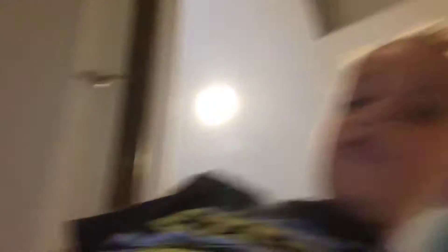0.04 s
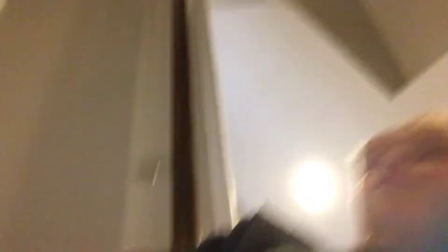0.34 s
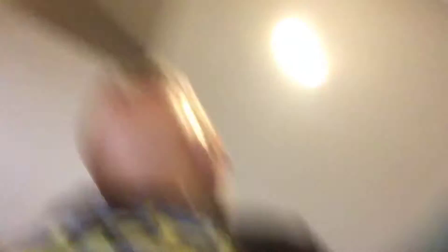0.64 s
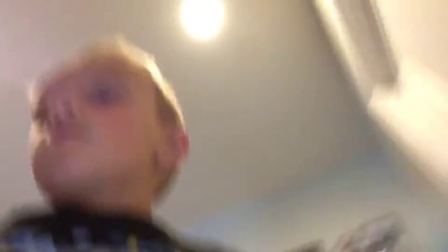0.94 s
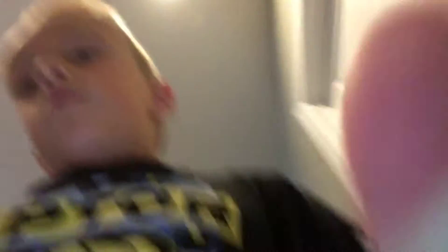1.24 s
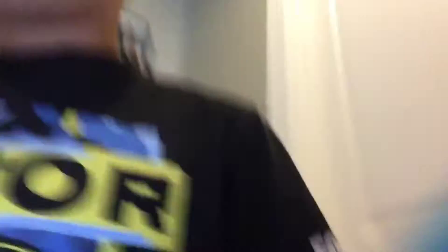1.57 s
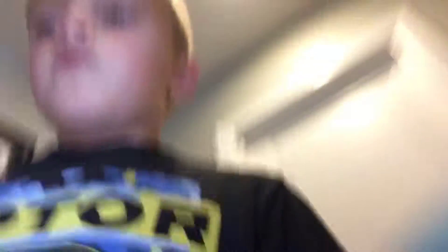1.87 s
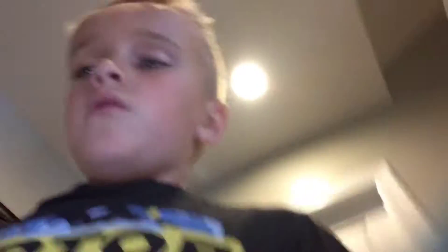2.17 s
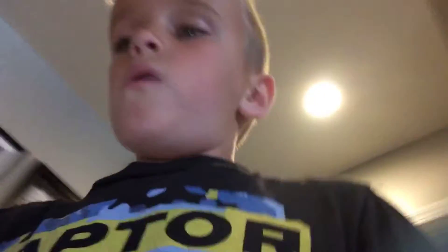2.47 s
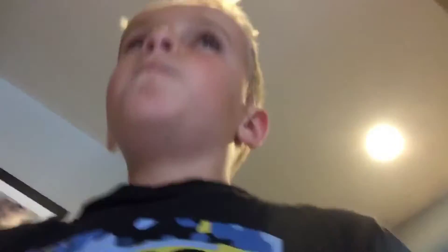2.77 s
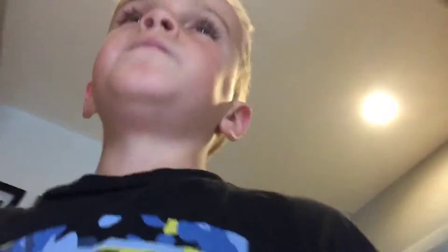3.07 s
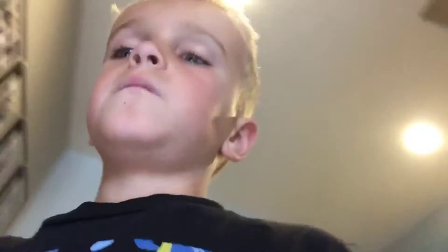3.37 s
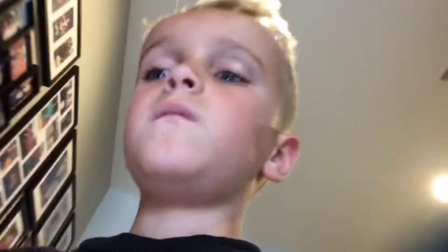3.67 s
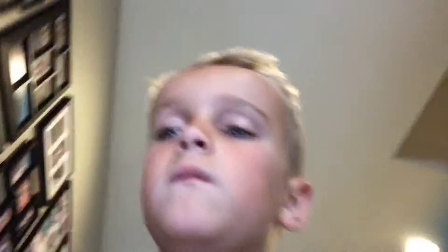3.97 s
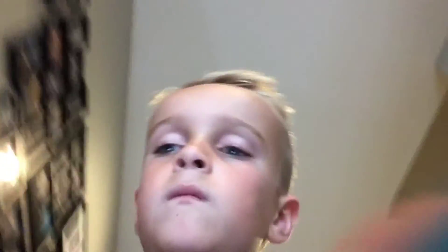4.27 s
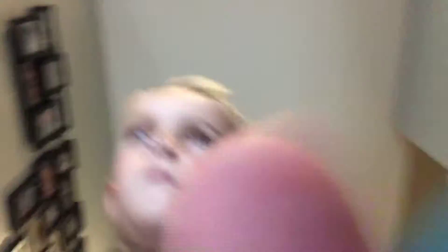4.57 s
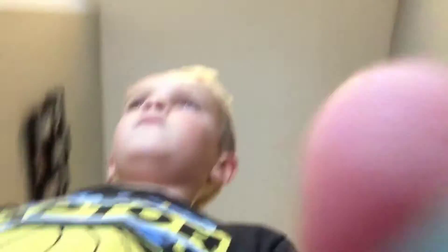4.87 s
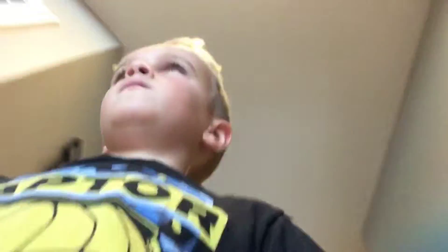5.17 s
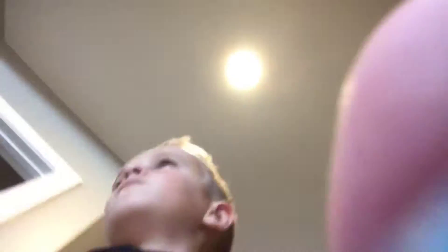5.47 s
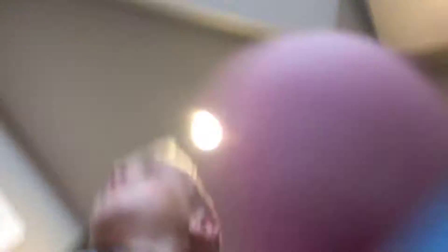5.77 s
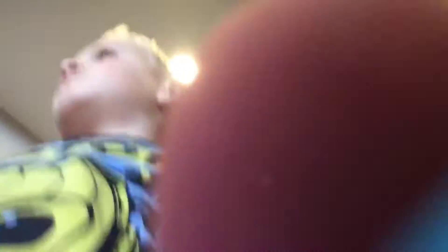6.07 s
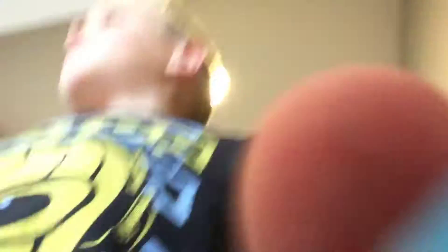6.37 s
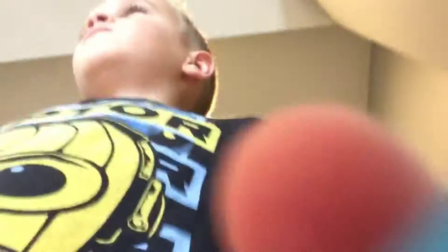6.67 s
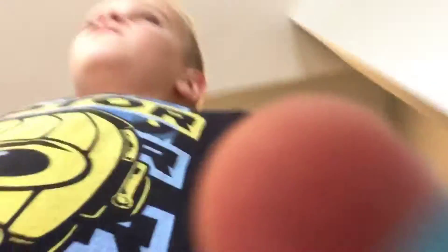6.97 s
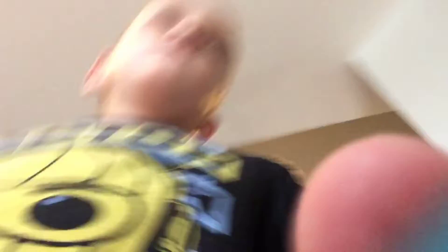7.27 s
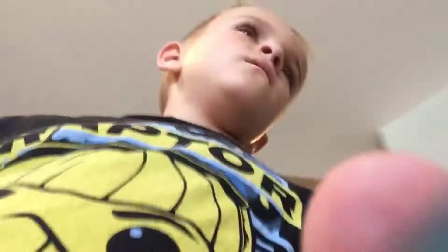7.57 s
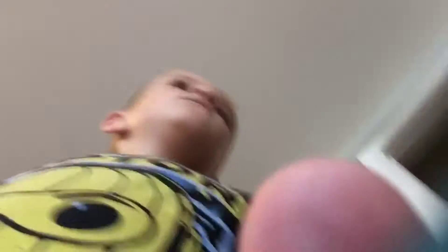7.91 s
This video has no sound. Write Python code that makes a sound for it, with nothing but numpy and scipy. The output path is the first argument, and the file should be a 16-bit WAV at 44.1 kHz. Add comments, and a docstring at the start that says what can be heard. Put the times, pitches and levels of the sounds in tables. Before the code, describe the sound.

Fingers handle a phone right beside its microphone in a quiet room, with faint low room tone and almost no echo. From the start, dull fingertip taps and short grainy rubs follow each other irregularly, with small squeaks and a clack in the first half second. A brief creak comes at 1.5 seconds, then firm knocks and scuffs around 1.8 and a squeaky rub at 2.2. The touches are lighter from about 2.5 to 3.5 seconds, before a cluster of thuds and clacks between 3.7 and 4.3. Around 5.2 seconds a fingertip rubs and squeaks with a wavering pitch, followed by pressed creaks near 5.7 and 6.1. Strong, low thuds land at about 6.6, 7.1 and 7.8 seconds among softer scuffs. A finger sometimes covers the microphone, making the touches duller and hollow, around 2 seconds and repeatedly after 5.

```python
"""Fingers shift their grip on a phone, right beside its microphone, as it is carried through a quiet room.
Skin taps the case, rubs over it in short grainy strokes, squeaks and creaks; some taps ring with a clack.
Each contact reaches the microphone treble first and bass last, so a tap falls in pitch to a thud.
Now and then a finger covers the port and dulls the top. At this distance the walls add almost nothing."""
import sys
import numpy as np
from scipy import signal
from scipy.fft import irfft
from scipy.io import wavfile
from scipy.ndimage import uniform_filter1d, minimum_filter1d

SR = 44100
rng = np.random.default_rng(int(sys.argv[2]) if len(sys.argv) > 2 else 0)


def store_wav(level_fs):
    """Save 16-bit WAV to argv[1]."""
    pcm = np.round(np.clip(np.atleast_2d(level_fs), -1, 1) * 32767)
    wavfile.write(sys.argv[1], SR, pcm.T.astype(np.int16))


N = 354692
FFT_SIZE = 8192
HZ = np.fft.rfftfreq(FFT_SIZE, 1 / SR)

# Levels are relative within each table.
# steady noise of room and microphone: frequency_hz, level_db
ROOM_TONE = [(15, -38), (25, -1), (87, -0.5), (309, -10.5), (427, -17.5), (677, -14.5), (1160, -42),
             (1740, -21.5), (2840, -35), (5570, -37), (10100, -47), (14000, -62), (16000, -80)]
# a faint hollow ring across the room: time_s, level_db
DISTANT_RING = [(2.38, -63), (2.45, -58), (2.505, -43.5), (2.55, -53), (2.6, -51), (2.66, -79)]
# the resting hand creeping on the case: time_s, level_db
GRIP_LEVEL = [(0.0, -40), (0.18, -26.5), (0.4, -39.5), (0.9, -35.5), (1.15, -47), (1.4, -38), (1.9, -39),
              (2.45, -33.5), (3.1, -49), (3.78, -36), (3.98, -46), (5.3, -41.5), (5.5, -43.5),
              (5.82, -32.5), (6.0, -42.5), (6.9, -44.5), (7.3, -39.5), (8.04, -49)]
# a finger lies over the microphone port: start_s, end_s, cover_db
PORT_COVERED = [(1.5, 1.56, 8), (1.72, 2.3, 6), (5.26, 5.86, 13.5), (6.02, 6.3, 17), (6.45, 6.61, 13),
                (7.0, 7.26, 25), (7.7, 8.04, 17)]
# the hollow tone that this gives a touch: frequency_hz, gain_db_per_cover_db
PORT_HOLLOW = [(110, 0), (290, -0.07), (450, -0.25), (580, 0), (800, 0.23), (1400, -0.33), (2300, 0),
               (3300, 0), (4800, 0.35), (6200, 0.2), (7500, 0)]
# creaks of a hard-pressed finger: start_s, length_s, first_wait_s, level_db, hardness_db
CREAKS = [(1.5153, .03, .0115, -9.5, -12), (5.6846, .069, .0033, -6, -14), (6.04, .048, .0135, -23, -12),
          (6.0946, .102, 0.014, -4.5, -14.5)]
# the case tightened by that finger: frequency_hz, gain_db
PRESSED_RESPONSE = [(60, -4.5), (110, 3), (290, 0.5), (440, -12), (600, -1), (820, 2), (1700, -1.5),
                    (5500, -4)]
# fingertip squeaks, one list of points each: time_s, pitch_hz, level_db
SQUEAKS = [
    [(.197, 250, -22), (.215, 296, -19), (.23, 318, -25), (.24, 337, -14.5), (.25, 318, -42)],
    [(.29, 250, -23), (.31, 221.4, -28), (.328, 175, -31)],
    [(.4, 429, -38), (.418, 464, -22), (.432, 467, -38)],
    [(2.2, 261.6, -23), (2.215, 300, -26.5), (2.24, 373, -23), (2.262, 300, -40)],
    [(5.19, 339, -21), (5.215, 387, -22.5), (5.228, 226.3, -14), (5.25, 211.6, -22.5), (5.271, 418, -16.5),
     (5.295, 378.7, -17.5), (5.316, 297, -17), (5.324, 240, -23)],
    [(5.39, 324.3, -42), (5.41, 353.6, -32.5), (5.432, 256, -37.5)],
    [(5.66, 360, -50), (5.675, 348, -29), (5.685, 334, -20)],
    [(7.022, 85.3, -40), (7.06, 78.5, -63), (7.085, 130.4, -23)],
    [(7.73, 116.5, -42.5), (7.76, 139.4, -51.5), (7.8, 197, -32.5)],
]
# how the case answers a squeak: frequency_hz, gain_db
SQUEAK_RESPONSE = [(40, -29), (120, 9.5), (230, 14), (410, -6.5), (620, 5.5), (820, 0.5), (1150, -8),
                   (1650, -20.5), (2300, -19), (3000, -38.5), (5700, -33.5), (7500, -59), (16000, -75.5)]
# strokes of skin over the case: start_s, end_s, level_db, swell_db, brightness_db
RUBS = [(0.087, 0.2, -36.5, -2, -9.5), (0.192, 0.247, -18.5, 2.5, -25), (0.274, 0.34, -20, -9, -39),
        (0.359, 0.436, -24.5, -9.5, -17), (0.43, 0.66, -39, -8, -17.5), (0.639, 0.688, -24, -6.5, -10.5),
        (0.762, 0.816, -24, -4.5, -11), (0.816, 0.914, -25.5, 1, -8.5), (0.896, 0.942, -38.5, -1, 3),
        (0.955, 1.025, -35, 11, 0.5), (1.087, 1.15, -37, -9, -4.5), (1.19, 1.217, -35.5, -8, -7),
        (1.235, 1.324, -32, 2, 1.5), (1.309, 1.377, -27, -6, 2), (1.369, 1.446, -39, -10, -7.5),
        (1.445, 1.463, -29, -6, -0.5), (1.514, 1.55, -25, 7, -21), (1.645, 1.693, -29.5, -20, -1.5),
        (1.711, 1.755, -25.5, 13, -22), (1.791, 1.81, -33, -3, -9.5), (1.812, 1.832, -12, -2, -15),
        (1.867, 1.889, -41, 3, -6), (1.975, 2.081, -26.5, -12.5, -24), (2.195, 2.268, -17, -1, -17.5),
        (2.31, 2.363, -31, -8, -16), (2.378, 2.497, -33, -2, -36), (2.655, 2.679, -28, 3, -29),
        (2.712, 2.76, -37, 16, -9), (2.752, 2.82, -35.5, -9, -27), (3.158, 3.394, -49.5, 9, -3),
        (3.531, 3.656, -44, -22, -5), (3.68, 3.768, -36, 4, -14), (3.858, 3.905, -30, 10, -9.5),
        (3.904, 3.97, -21, -17, -8.5), (4.084, 4.206, -47, -1, -15), (4.198, 4.314, -43, 16, -9),
        (4.392, 4.437, -55.5, -2, 2), (4.553, 4.748, -43.5, 3.5, -10), (4.89, 5.03, -44.5, 18, -5.5),
        (5.109, 5.198, -40, -2, -4.5), (5.183, 5.259, -22, 12, -11), (5.387, 5.44, -32, -5.5, -42),
        (5.641, 5.677, -29.5, 11, -23.5), (5.687, 5.715, -20, -1.5, -17.5), (5.801, 5.871, -29, -6, -25),
        (5.933, 6.007, -34.5, 1, -21), (6.027, 6.1, -29, 23, -27), (6.093, 6.207, -25.5, 4, -40),
        (6.456, 6.563, -40.5, -1, -10), (6.549, 6.6, -28.5, 0, -19), (6.924, 6.981, -53.5, 4, -9),
        (7.024, 7.099, -39.5, 17, -18), (7.173, 7.247, -38.5, -9, -10), (7.388, 7.509, -35, -16, -10.5),
        (7.726, 7.824, -40, 11.5, -7.5), (7.844, 7.948, -40, -11, -11)]
# how the case answers a stroke: frequency_hz, gain_db
RUB_RESPONSE = [(20, -64), (50, 1.5), (78, 3), (300, 5), (480, -2.5), (750, -9), (1200, -13), (1700, -13),
                (2200, -17), (2900, -23), (6000, -29), (7400, -33.5), (9000, -33.5), (11000, -43),
                (16000, -47)]
# the brief pitched clack that rings in some fingertip taps: start_s, level_db, pitch_hz
TAP_RINGS = [(0.2845, -5.5, 2010), (0.339, -17, 2350), (0.846, -6, 1630), (1.747, -6, 1200),
             (1.822, -9, 1880), (3.65, -26, 1500), (3.916, -8, 1700), (4.244, -17, 1300),
             (4.295, -5.5, 1440), (7.1145, -19, 930), (7.147, -19, 1380)]
# the modes of that clack: pitch_ratio, level_db
TAP_RING_MODES = [(.77, -2), (1, 3.5), (1.33, -5.5)]
# fingertip taps: start_s, level_db, weight_db, thud_hz, hardness_db (pad below 0, nail above)
TAPS = [(0.157, -22, 21, 198, -24), (0.248, -22, 18.5, 200, -24), (0.284, -5.5, -2.5, 316, -4),
        (0.34, -6, 19, 250, -22), (0.362, -23.5, 23, 293, -9), (0.371, -25.5, 28, 120, -10),
        (0.389, -28, 31, 129, -30), (0.464, -11.5, 4.2, 240, -22), (0.643, -20.5, 2, 148, -2.5),
        (0.656, -12, 18, 199, -11), (0.663, -12, 21.5, 225, -7.5), (0.674, -14, 10.6, 144, -12),
        (0.83, -29, 10, 180, 11), (0.847, -17.5, 4.3333, 180, -4), (0.866, -13, 5.3, 310, -9),
        (0.903, -15.5, 13, 146, -17), (0.978, -19, 3.7, 130, -18), (0.994, -14.5, 14.7, 78.6, 3),
        (1.024, -23, 21.5, 201, -28), (1.207, -33.5, 35.8, 89, -10), (1.247, -19.5, 20, 204, -6),
        (1.305, -15.5, 25.5, 135, -6), (1.447, -17, 17.2, 105, -8), (1.621, -43, 32, 150, 7),
        (1.653, -12.5, 21, 245, -18), (1.681, -26.5, 25, 80, 6.5), (1.729, -25, 26, 121, -1),
        (1.747, -7, 11.7, 309, -14.5), (1.815, -12.5, 10.7, 308, -12), (1.8214, -2.5, 11, 195, -18),
        (2.012, -6.5, 18, 207, -18), (2.065, -16.5, 15, 113, -16.5), (2.143, -28.5, 13, 190, -5),
        (2.259, -33, 29.5, 129, -16), (2.4, -23.5, 21, 203, -21), (2.529, -25.5, 26.4, 233, -33),
        (2.673, -26.5, 26.6, 144, -27), (2.75, -16.5, 24.8, 187, -3), (2.782, -17, 20.4, 134, -13),
        (2.888, -19, 15.4, 233, -16.5), (2.926, -43.5, 10, 220, 2.5), (3.018, -32.5, 17, 158, -14),
        (3.178, -29.5, 16, 120, -5.5), (3.253, -26.5, 16, 253, -16), (3.292, -24.5, 17, 221, -11.5),
        (3.45, -28.5, 26.5, 149, -45), (3.539, -24, 8.2, 120, -4.5), (3.65, -22, 15.4, 290, -18),
        (3.678, -9, 16.3, 200, -17.5), (3.6841, -3.5, 13.3, 300, -22), (3.712, -15.5, 10, 230, -44),
        (3.734, -18, 11, 80, -9.5), (3.757, -46.5, 15, 110, 37.5), (3.837, -27.5, 19.4, 202, 0),
        (3.862, -32, 36, 201, 23.5), (3.915, -13, 23.5, 70, 8.5), (3.971, -19, 17.5, 143, 2),
        (4.148, -34.5, 7.2, 180, -4), (4.19, -26.5, 12.5, 320, -2.5), (4.218, -22.5, 18.7, 200, -5),
        (4.246, -14, 17.7, 196, -2.5), (4.2933, -13.5, 12.5, 90.5, -5.5), (4.413, -35, 19.7, 120, -4.5),
        (4.671, -17.5, 10.6, 217, -9), (4.709, -22, 22, 147, -3), (4.724, -25, 20, 180, -4),
        (4.934, -33, 11, 300, 1), (4.977, -16, 10, 231, -8), (5.139, -18.5, 13, 120, -7),
        (5.241, -14, 17, 168, -4), (5.326, -11.5, 16.6, 113, -17), (5.88, -28, 24.3, 90, 3),
        (5.965, -24, 19, 170, -7), (6.1378, -10, 7.7, 132, -10.5), (6.325, -18, 16.2, 170, -0.5),
        (6.348, -27.5, 12, 200, -3), (6.508, -27, 24, 190, -10), (6.568, -29, 7.6, 181, -3),
        (6.5882, -2, 15.8, 126, -16.5), (6.622, -27, 18.7, 130, -7), (6.697, -39.5, 20, 220, 5),
        (6.785, -32, 15.4, 200, -6.5), (7.1141, 0.5, 10.4, 117, -13.5), (7.146, -23.5, 21.7, 230, -18),
        (7.316, -15, 16, 120, -7), (7.396, -30, 18, 159, 3.5), (7.437, -18, 7.4, 130, -7),
        (7.482, -21, 6.9, 211, -34), (7.815, -2.5, 12, 104, -8), (7.881, -16, 11, 194, -29)]
# how the case answers a tap: frequency_hz, gain_db
TAP_RESPONSE = [(20, -56), (45, -22), (60, -4.5), (74, 3), (160, -3.5), (420, -3), (620, 3), (760, -5),
                (940, -14), (1250, -10.5), (1700, -16.5), (2200, -15.5), (2900, -30), (3500, -24.5),
                (4600, -28), (6200, -28), (7300, -34.5), (9000, -30.5), (11000, -43.5), (16000, -56)]

# the ranges that a contact can stress
THUD_HZ, BODY_HZ, KNOCK_LOW_HZ, KNOCK_HIGH_HZ = 110, 290, 580, 820
CLICK_HZ, TICK_HZ, AIR_HZ = 1700, 5500, 12000


def amp(db):
    """Decibels to gain."""
    return 10 ** (np.asarray(db) / 20)


def unit_rms(x):
    """Scales to an rms of 1."""
    return x / np.sqrt(np.mean(x ** 2) + 1e-20)


def spectrum(points):
    """A curve in dB through (frequency_hz, gain_db) points on a log-frequency axis."""
    hz, db = np.transpose(points)
    return np.interp(np.log(HZ + 1), np.log(hz + 1), db)


def add(mix, start_s, sound):
    """Mixes a sound in at a time."""
    part = mix[max(round(start_s * SR), 0):][:len(sound)]
    part += sound[:len(part)]


def wander(count, hz):
    """A random drift that takes a new direction hz times a second."""
    knots = rng.standard_normal(FFT_SIZE)
    return np.interp(np.arange(count) * hz / SR, np.arange(FFT_SIZE), knots)


def case_impulse(gain_db, corner_hz=60):
    """Impulse response of case and port: each frequency arrives about one of its own cycles late."""
    log_gain = np.log(amp(gain_db))
    mirrored = np.r_[log_gain, log_gain[-2:0:-1]]
    log_minimum_phase = np.conj(signal.hilbert(mirrored))[:len(HZ)]
    lag = 2 * np.pi * np.log(1 + HZ / corner_hz)
    return irfft(np.exp(log_minimum_phase - 1j * lag))


def friction(count, per_s, spread_db, smooth):
    """Skin ridges catch and let go: tiny slips of uneven size over a smooth hiss."""
    chance, size, hiss = rng.random(count), rng.exponential(1, count), rng.standard_normal(count)
    slips = (chance < per_s / SR) * amp(spread_db * np.minimum(size, 4)) * np.sign(hiss)
    return unit_rms(unit_rms(slips) + smooth * hiss)


def background(ring_hz=800, ring_width_hz=220, tone_db=-61, hiss_db=-90):
    """Steady room tone, the microphone's own hiss, and one brief hollow ring farther off."""
    t = np.arange(N) / SR
    noise = rng.standard_normal(N + FFT_SIZE)
    tone = unit_rms(signal.oaconvolve(noise, case_impulse(spectrum(ROOM_TONE)))[FFT_SIZE:][:N])
    waver = wander(N, hz=ring_width_hz) + 1j * wander(N, hz=ring_width_hz)
    ring = unit_rms((waver * np.exp(2j * np.pi * ring_hz * t)).real)
    time_s, level_db = np.transpose(DISTANT_RING)
    ring *= np.interp(t, time_s, amp(level_db), left=0, right=0)
    return amp(tone_db) * tone + amp(hiss_db) * rng.standard_normal(N) + ring


def walls(x, t60_s=0.17, delay_s=0.006, wet_db=-35):
    """The walls return very little of a sound so close to the microphone."""
    t = np.arange(SR // 2) / SR
    tail = rng.standard_normal(len(t)) * 1000. ** (-t / t60_s) * (t > delay_s)
    return amp(wet_db) * signal.oaconvolve(x, tail / np.linalg.norm(tail))[:N]


def grip(trim_db=-4, flutter_db=5):
    """The holding hand never rests: a dull, faint creep between the strokes."""
    muffle_db = spectrum([(30, -16.5), (75, 12), (130, 8), (300, 0), (800, -2), (2000, -8),
                          (6000, -10), (14000, -22)])
    drive = friction(N, per_s=900, spread_db=2.5, smooth=0.63) * amp(flutter_db * wander(N, hz=30.446))
    creep = unit_rms(signal.oaconvolve(drive, case_impulse(spectrum(RUB_RESPONSE) + muffle_db))[:N])
    return creep * amp(trim_db + np.interp(np.arange(N) / SR, *np.transpose(GRIP_LEVEL)))


def cover_db(time_s):
    """How heavily a finger covers the port at this moment; 0 when it is open."""
    return sum(depth for start, end, depth in PORT_COVERED if start <= time_s < end)


def covered_port(time_s):
    """A covering finger shuts out the very top and traps a pocket of air that rings just below it."""
    return cover_db(time_s) * spectrum([(3200, -0.087), (4800, 0.059), (6800, -0.12), (8500, -0.96)])


def touch(time_s, weight_db, thud_hz, hardness_db, width_ratio=1.296, foot_ratio=2.9):
    """The spectrum of one touch in dB: flesh adds a low thud, hardness lifts the treble."""
    thud = spectrum([(thud_hz / foot_ratio, weight_db - 9.5), (thud_hz / width_ratio, weight_db),
                     (thud_hz * width_ratio, weight_db), (KNOCK_LOW_HZ, 0)])
    click_db = 5 + 0.65 * hardness_db
    air_db = hardness_db + np.clip(0.6 * hardness_db, -6, 6)  # hard contacts keep their top
    treble = spectrum([(KNOCK_HIGH_HZ, 0), (CLICK_HZ, click_db), (TICK_HZ, hardness_db), (AIR_HZ, air_db)])
    # each touch damps the case differently
    ripple = spectrum(np.c_[np.geomspace(200, 16000, 36), 1.6 * np.r_[0, rng.standard_normal(35)]])
    port = cover_db(time_s) * spectrum(PORT_HOLLOW) + covered_port(time_s)
    return spectrum(TAP_RESPONSE) + thud + treble + ripple + port


def ticks(count=70, over_grip_db=26, spread_db=2.5):
    """Tiny touches fall at random, as strong as the grip is restless."""
    out = np.zeros(N)
    for start, (size, hardness) in zip(rng.uniform(0, N / SR, count), rng.standard_normal((count, 2))):
        level_db = np.interp(start, *np.transpose(GRIP_LEVEL)) + over_grip_db + spread_db * size
        colour_db = touch(start, weight_db=12, thud_hz=180, hardness_db=-8 + 3 * hardness)
        add(out, start, case_impulse(level_db + colour_db))
    return out


def push(skid, skid_s, **grain):
    """One impulse on the case, then a skid of friction that dies away."""
    t = np.arange(FFT_SIZE // 8) / SR
    return (t == 0) + skid * np.exp(-t / skid_s) * friction(len(t), **grain)


def creaks(gain=30, growth=0.16, slowing=1.25, stick_limit_s=0.0137, jitter_s=0.0006):
    """A hard-pressed finger ratchets to rest: the longer it sticks, the stronger the slip and its skid."""
    out = np.zeros(N)
    for start, length, wait, level_db, hardness_db in CREAKS:
        slip_s = start
        while slip_s < start + length:
            softer, later = rng.standard_normal(2)
            size = gain * (wait / stick_limit_s) ** growth * amp(level_db - 0.1 * softer)
            slip = push(skid=0.036, skid_s=0.003, per_s=820, spread_db=7.5, smooth=0.19)
            colour_db = touch(slip_s, weight_db=8, thud_hz=95, hardness_db=hardness_db)
            response = case_impulse(spectrum(PRESSED_RESPONSE) + colour_db)
            add(out, slip_s + jitter_s * later, size * signal.fftconvolve(slip, response))
            slip_s += wait
            wait = min(wait * slowing, stick_limit_s)
    return out


def squeaks(jitter=0.0027, uneven_db=0.8):
    """A fingertip sticks and slips fast enough to make a gliding pitch."""
    out, response = np.zeros(N), case_impulse(spectrum(SQUEAK_RESPONSE))
    response /= np.linalg.norm(response)
    for points in SQUEAKS:
        time_s, pitch_hz, level_db = np.transpose(points)
        t = np.arange(time_s[0], time_s[-1], 1 / SR)
        rate_hz = np.interp(t, time_s, pitch_hz) * (1 + jitter * wander(len(t), hz=300))
        slips = np.diff(np.floor(np.cumsum(rate_hz) / SR), prepend=0)
        size = amp(np.interp(t, time_s, level_db) + uneven_db * wander(len(t), hz=250))
        size *= np.sqrt(SR / rate_hz)  # same power at any pitch
        add(out, time_s[0], signal.fftconvolve(slips * size, response))
    return out


def rubs(edge_share=0.11, flutter_db=3.5, split_hz=1100, firm_db=-26, arch_db=3):
    """Each stroke shakes the case with dense friction, while single skin ridges crackle on top."""
    out, case_db = np.zeros(N), spectrum(RUB_RESPONSE)
    case_gain = np.linalg.norm(case_impulse(case_db))
    low_share = 1 / (1 + ((HZ + 20) / split_hz) ** 2) ** 2
    low_db, high_db = 10 * np.log10(low_share), 10 * np.log10(1 - low_share)
    for start, end, level_db, swell_db, bright_db in RUBS:
        count = round((end - start) * SR)
        pressure = amp(swell_db * np.linspace(-.5, .5, count) + flutter_db * wander(count, hz=104.5))
        pressure *= signal.windows.tukey(count, edge_share)
        drag = unit_rms(pressure * friction(count, per_s=3000, spread_db=2.5, smooth=1))
        speed = amp(arch_db * np.sin(np.linspace(0, np.pi, count)))  # fastest mid-stroke
        crackle = unit_rms(speed * pressure * friction(count, per_s=450, spread_db=5.5, smooth=0.85))
        rumble_db = 0.64 * (firm_db - level_db) - 0.51 * cover_db(start)  # light strokes mostly rumble
        rasp_db = -1 + 0.34 * bright_db
        air_db = bright_db + np.clip(bright_db + 5, -12, 6)
        stress_db = spectrum([(THUD_HZ, rumble_db), (BODY_HZ, 0), (KNOCK_HIGH_HZ, 0),
                              (CLICK_HZ, rasp_db), (TICK_HZ, bright_db), (AIR_HZ, air_db)])
        for drive, band_db in ((drag, low_db), (crackle, high_db)):
            response = case_impulse(case_db + stress_db + covered_port(start) + band_db)
            add(out, start, amp(level_db) / case_gain * signal.fftconvolve(drive, response))
    return out


def tap_rings(trim_db=-5, t60_s=0.0075, rise_s=0.00054):
    """Some taps ring with a brief pitched clack: three modes that die within milliseconds."""
    out, t = np.zeros(N), np.arange(FFT_SIZE // 4) / SR
    envelope = (1 - np.exp(-t / rise_s)) * 1000. ** (-t / t60_s)
    for start, level_db, pitch_hz in TAP_RINGS:
        ring = sum(amp(mode_db) * np.sin(2 * np.pi * (ratio * pitch_hz * t + rng.random()))
                   for ratio, mode_db in TAP_RING_MODES)
        add(out, start, amp(level_db + trim_db) * envelope * ring)
    return out


def taps(gain=30):
    """A fingertip lands beside the microphone: one push on the case and a brief skid."""
    out = np.zeros(N)
    for start, level_db, weight_db, thud_hz, hardness_db in TAPS:
        landing = push(skid=0.063, skid_s=0.0027, per_s=2700, spread_db=7, smooth=0.1)
        response = case_impulse(level_db + touch(start, weight_db, thud_hz, hardness_db))
        add(out, start, gain * signal.fftconvolve(landing, response))
    return out


def scene():
    """The hand right at the microphone, the quiet room behind it, in mono."""
    hand = taps() + tap_rings() + rubs() + squeaks() + creaks() + ticks()
    return (hand + walls(hand) + grip() + background())[None]


def record(dry, ceiling=0.51, cutoff_hz=16500):
    """The phone's fast limiter holds the loudest thuds down; a low-pass removes the very top."""
    allowed = np.minimum(1, ceiling / (abs(dry) + 1e-9))
    gain = uniform_filter1d(minimum_filter1d(allowed, size=200), size=200)
    low_pass = signal.firwin(511, cutoff_hz, window=("kaiser", 9), fs=SR)
    return signal.oaconvolve(dry * gain, low_pass[None], "same")


dry = scene()
out = record(dry)
store_wav(out)
```